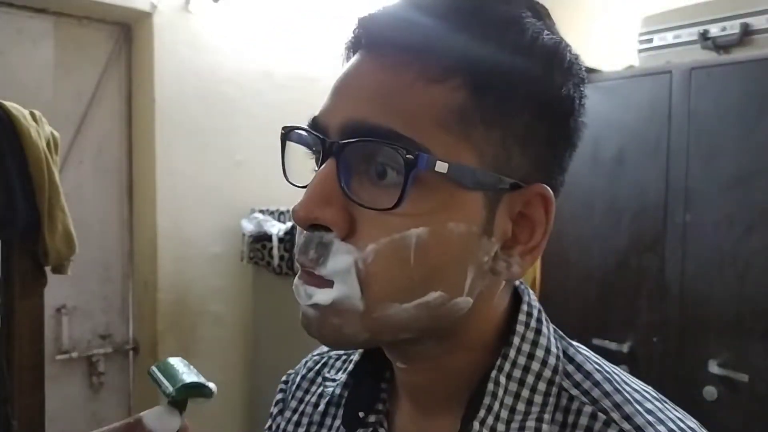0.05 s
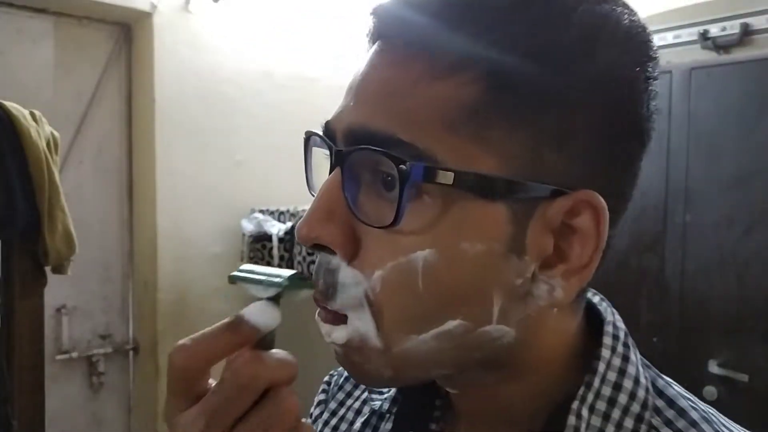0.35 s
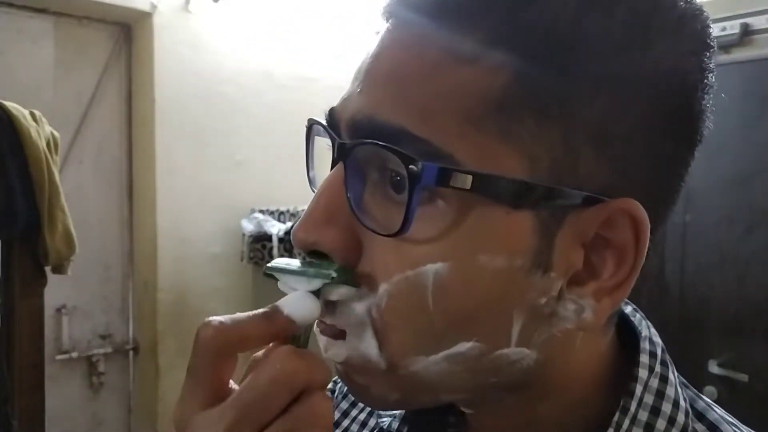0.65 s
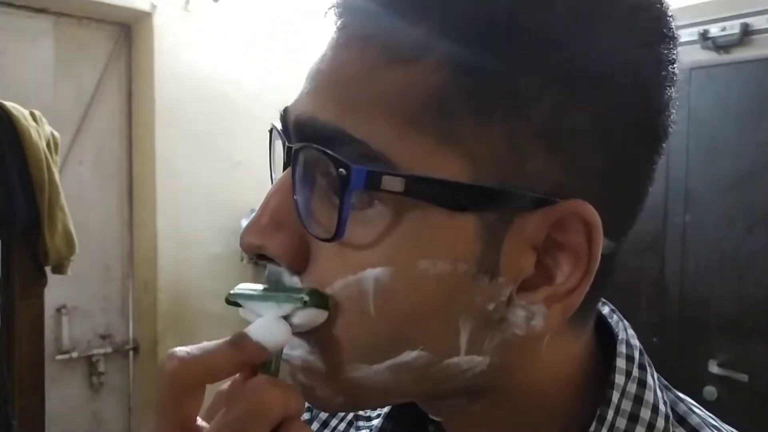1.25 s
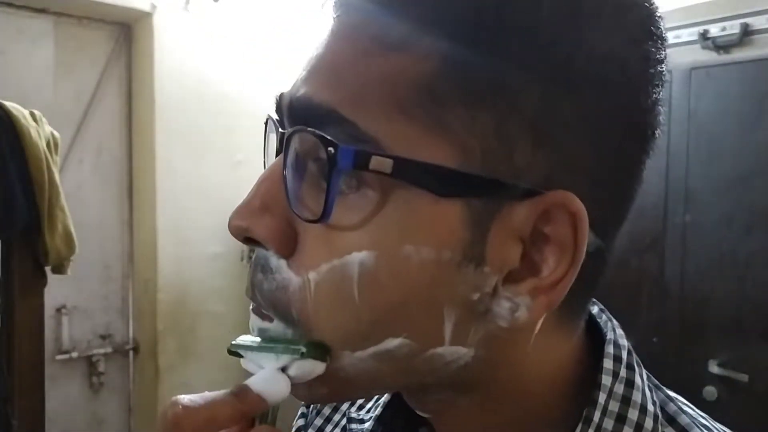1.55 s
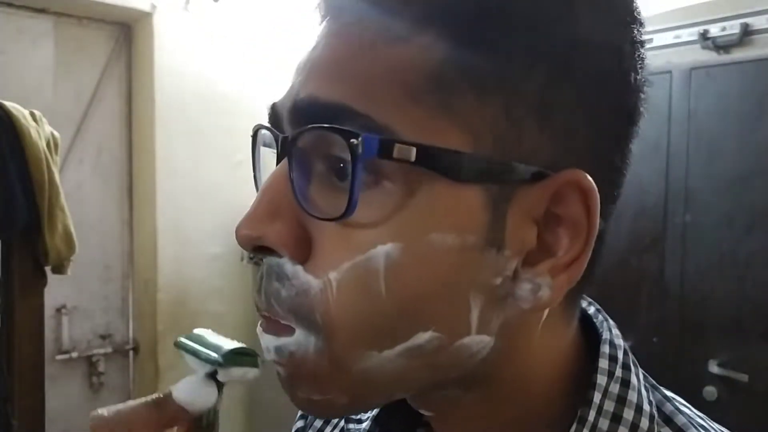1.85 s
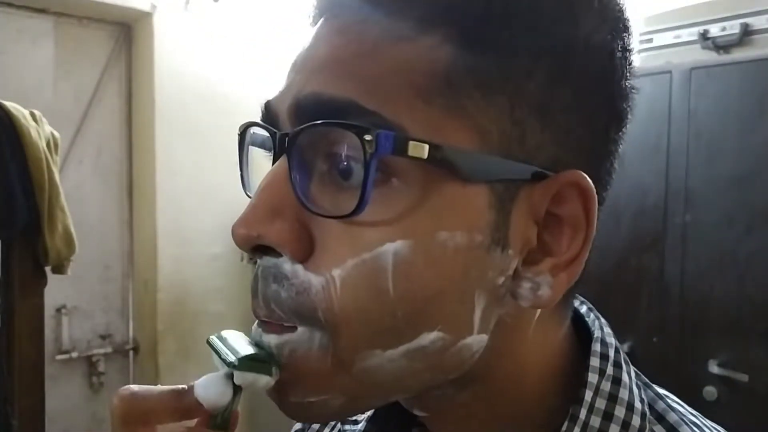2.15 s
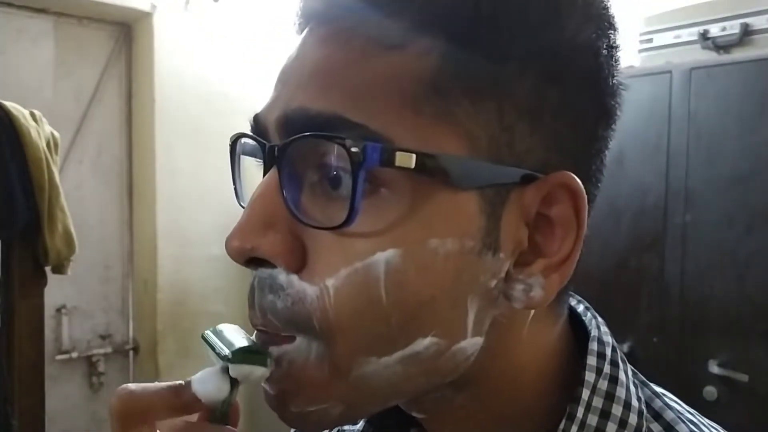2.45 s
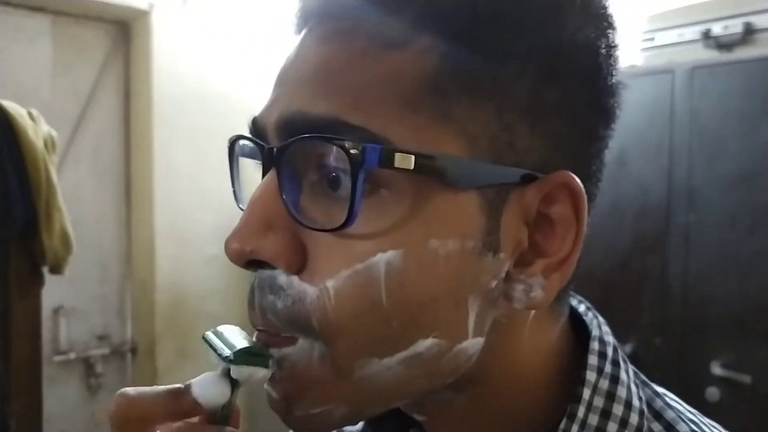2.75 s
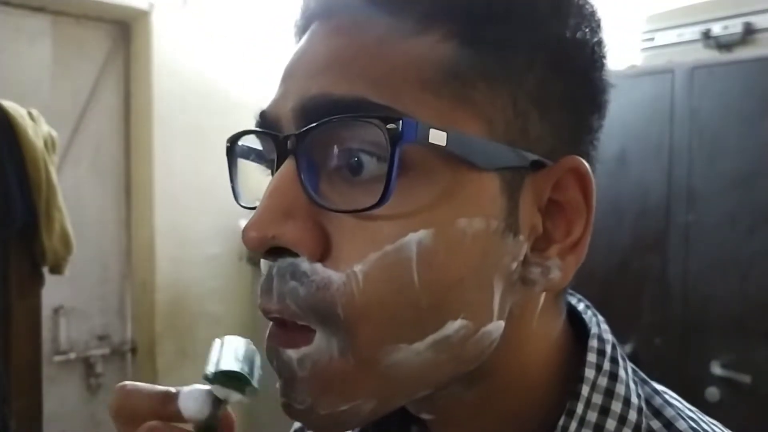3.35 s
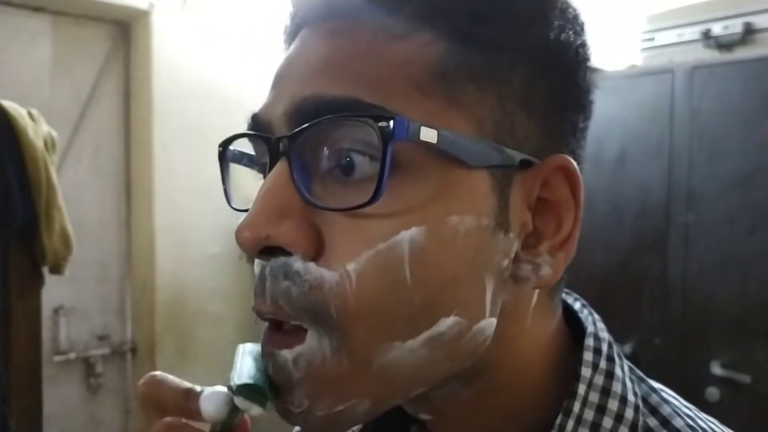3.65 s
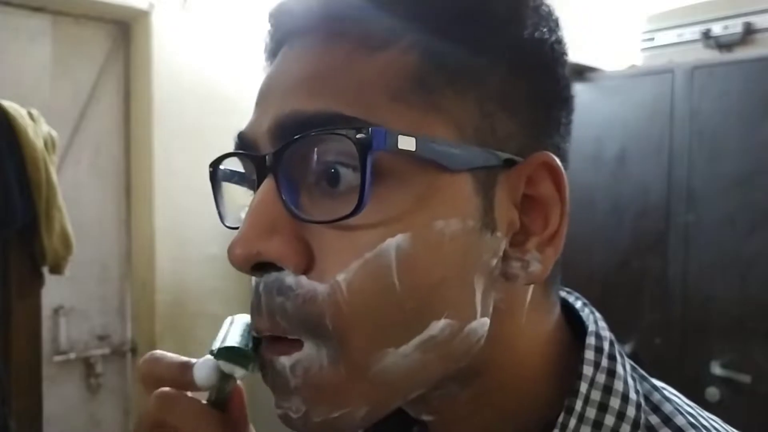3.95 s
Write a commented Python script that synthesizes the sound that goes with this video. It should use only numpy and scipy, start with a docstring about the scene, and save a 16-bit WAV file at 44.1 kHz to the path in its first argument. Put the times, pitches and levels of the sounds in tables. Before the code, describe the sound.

Close, scratchy shaving strokes follow a quick swish as a razor is raised. Hairs crackle and snap under the blade in uneven bursts, over the soft hiss of a small room and a low, distant engine hum.

```python
"""A small room hisses and rumbles, and a distant engine hums through the walls.
A safety razor is raised with a quick swish, glides with a thin high song, then scrapes stubble off a
lip in short dry strokes, gliding again between them. Each stroke is a shower of tiny hair cuts that hiss
at the blade and ring in the razor's head; coarser hairs crackle and single stiff ones snap.
Past the halfway point the engine speeds up a little and its firing tone fades."""
import sys
import numpy as np
from scipy import signal
from scipy.fft import rfft, irfft, next_fast_len
from scipy.io import wavfile

SR = 44100
rng = np.random.default_rng(int(sys.argv[2]) if len(sys.argv) > 2 else 0)


def store_pcm(level_fs):
    """Save levels as 16-bit WAV."""
    pcm = np.round(np.clip(level_fs, -1, 1) * 32767).astype(np.int16)
    wavfile.write(sys.argv[1], SR, np.atleast_2d(pcm).T)


N = 176400
TIME = np.arange(N) / SR
SIZE = next_fast_len(N + SR // 2)
FREQS = np.arange(SIZE // 2 + 1) * SR / SIZE

# room tone, the colour of its low and high layers: (frequency [Hz], relative level [dB])
RUMBLE_COLOUR = [(20, -4.5), (28, -8.5), (42, -6.5), (60, -9), (85, -0.5), (105, 2.5), (145, -6),
                 (188, -3.5), (225, -11), (290, -10.5), (380, -14), (480, -18), (700, -30.5), (1200, -70)]
HISS_COLOUR = [(280, -46), (480, -3), (651, -4), (776, -1), (859, -5), (1040, -3), (1120, -6), (1700, -9),
               (1910, -12), (2240, -11.5), (2520, -12.5), (3470, -15.5), (4990, -25.5), (9060, -17),
               (11300, -35), (13400, -34), (15500, -50)]
# their fader rides: (time [s], level [dB])
RUMBLE_LEVEL = [(0, -40), (0.6, -39), (1.3, -40.5), (2.4, -40.5), (4, -43)]
HISS_LEVEL = [(0, -51.5), (0.3, -50), (1.1, -51), (1.28, -53.5), (1.5, -50), (1.9, -51), (2.6, -52.5),
              (4, -53.5)]
# panning of room tone and engine: (frequency [Hz], left minus right [dB])
BED_BALANCE = [(60, 0.6), (200, -3), (380, -2), (600, 0.5), (2500, 0), (6500, -1), (8600, -4), (9300, 2.5),
               (10700, -2), (12500, 1)]
# how alike the room tone is on both sides: (frequency [Hz], correlation [0 to 1])
BED_LIKENESS = [(60, 0.84), (200, 1), (380, 0.64), (700, 0.34), (1300, 0), (4400, 0), (8000, 0.89),
                (15000, 0.97)]
# engine speed: (time [s], firing rate [Hz])
FIRING_RATE = [(0.2, 62.55), (0.41, 63.08), (0.49, 63.77), (2.12, 63.44), (2.18, 64.62), (2.6, 66.58),
               (3.9, 66.5)]
# fader ride of the firing tone: (time [s], level [dB])
FIRING_LEVEL = [(0.0, -46), (0.1, -59), (0.4, -33), (0.49, -38), (0.53, -33), (1.32, -32), (1.68, -34),
                (1.82, -39), (2.09, -35), (2.56, -50), (2.62, -43), (3.01, -46), (3.34, -42), (3.5, -55),
                (3.53, -49), (4.0, -55)]
# rides of its octave and of the overtones above: (time [s], relative level [dB])
OCTAVE_LEVEL = [(0.0, -47), (0.04, -55), (0.53, -43), (1.04, -43.5), (1.22, -60), (1.38, -43.5),
                (2.48, -41.5), (2.9, -55), (2.94, -61), (4.0, -45.5)]
OVERTONE_LEVEL = [(0, -56), (0.7, -49.5), (1.3, -52), (2.1, -52), (2.8, -54), (4, -54)]
# the engine's overtones: (multiple of the firing rate [ratio], relative level [dB])
OVERTONES = [(2.5, -2.5), (3, 1), (4, -2.5), (5.8, -9)]

# the swish as the razor is raised: (full level at [s], attack [s], hold [s], release [s], level [dB])
SWISH_BURSTS = [(0.063, 0.00069, 0.011, .01, -42), (0.078, 0.0036, 0.016, 0.039, -35.5)]
# its colour: (frequency [Hz], relative level [dB])
SWISH_COLOUR = [(1200.0, -23), (1800.0, -13.0), (2300.0, -5), (3000.0, -4.5), (3800.0, -13.5),
                (4600.0, -9.5), (6200.0, -9.5), (7300.0, -7.5), (8700.0, 3), (9700.0, -5), (11000.0, -5.5),
                (12300.0, -14.5), (13300, -23), (15000.0, -22.5)]
# its panning: (frequency [Hz], left minus right [dB])
SWISH_BALANCE = [(6200.0, -0.3), (7300.0, -7.0), (8700.0, -4.9), (9700.0, 3.4), (11000.0, 9.4),
                 (12300.0, 4.9), (15000.0, -1.0)]
# the direct sound lags on the left: (frequency [Hz], left minus right phase [rad])
LEFT_PHASE = [(0, 0), (1300, -1.6), (2600, -1.6), (3600, -3.4), (4900, -3.9), (5300, -6), (16000, -6.3)]

# the blade glides lightly and sings:
# (full level at [s], attack [s], hold [s], release [s], pitch [Hz], resonance width [Hz], level [dB])
GLIDES = [(0.45, 0.022, 0.059, .03, 8550, 700, -58.5), (0.512, 0.025, .09, .05, 8100, 450, -62.5),
          (1.035, 0.051, 0.11, 0.065, 8260, 500, -59), (2.34, .03, 0.075, 0.034, 8400, 500, -57.5),
          (3.075, .03, 0.13, .03, 8300, 601, -62), (3.525, .015, 0.091, 0.053, 6360, 1700, -58.5),
          (3.737, .03, .05, .04, 8100, 700, -61.5)]
# shaving strokes: (full pressure at [s], attack [s], hold [s], release [s],
# blade hiss [dB], head ring [dB], head pitch [ratio], relative crackle level [dB])
STROKES = [(0.821, 0.13, .030, 0.04, -54, -59, 1.03, -53.5),
           (0.901, 0.032, 0.085, 0.043, -53, -52.5, 1.09, -53.5),
           (1.375, 0.034, 0.039, 0.046, -51, -53, 0.97, -55.5),
           (1.521, 0.028, 0.022, 0.028, -58, -81, 1.21, -54),
           (1.596, 0.0069, 0.069, 0.073, -54, -56.5, 0.79, -66),
           (1.727, .020, 0.022, .016, -62, -68, 0.81, -56),
           (2.21, 0.042, .038, 0.038, -46.3, -47, 1.0, -49.5),
           (2.573, 0.03, 0.034, 0.04, -44.8, -46.8, 1.0, -54),
           (2.874, 0.0058, 0.031, .020, -51, -56, 0.83, -62),
           (2.912, 0.015, 0.024, 0.034, -45.7, -47, .98, -56),
           (3.013, 0.056, 0.028, 0.024, -52, -69, 1.0, -59),
           (3.299, 0.03, 0.012, 0.028, -47, -51, 1.02, -65),
           (3.548, 0.033, 0.14, .020, -55.5, -60, 1.2, -74),
           (3.646, 0.0068, 0.022, 0.062, -47.5, -51.5, 1.01, -63)]
# colour of the hairs parting at the blade: (frequency [Hz], relative level [dB])
BLADE_COLOUR = [(3300.0, -5.5), (4000.0, -5.5), (4600.0, -3), (5150.0, -14), (6000.0, -9), (6500, -10.5),
                (7100.0, -5.5), (7800.0, -1.8), (8700.0, 2.3), (9500.0, -5.5), (10800.0, -7.5),
                (12400.0, -13.5), (14000.0, -17.5), (15400.0, -21.5)]
# panning of glides and strokes: (frequency [Hz], left minus right [dB])
RAZOR_BALANCE = [(5200.0, -0.9), (6300.0, -1.7), (7000.0, -5.3), (7800.0, -9.3), (8700.0, -7.3),
                 (9500.0, -0.4), (10800.0, 4.3), (12300.0, 0.8), (14000.0, 0.4), (15400.0, -0.4)]
# razor head resonances: (frequency at pitch ratio 1 [Hz], width [Hz], relative level [dB])
HEAD_MODES = [(1530, 300, -6), (1942.4, 260, 0.5), (2226, 320, -0.5), (2695, 380, 1), (2830, 200, -7.5)]
# single stiff hairs snap: (time [s], relative level [dB])
SNAPS = [(0.81, -47), (0.823, -37.5), (0.8334, -44), (0.8605, -40), (0.955, -40), (0.985, -36.5),
         (1.2716, -44), (1.3638, -43), (1.374, -41), (1.5370, -41), (1.588, -33.5), (1.6292, -36.5),
         (2.034, -47), (2.1125, -43.5), (2.1429, -40), (2.158, -39), (2.189, -35), (2.4698, -46),
         (2.5541, -32.5), (2.574, -41), (2.874, -39), (2.9068, -41), (3.0067, -40), (3.028, -36.5),
         (3.2026, -47), (3.2774, -45), (3.2984, -31.5), (3.6556, -33)]

OCTAVE_TRIM_DB, OVERTONE_WAVER_DB, OVERTONE_WAVER_RAD = -1, 2, 0.3
ROOM_T60_S, BLADE_ROOM_DB, HEAD_ROOM_DB = 0.11, -1.5, -0.5
SWISH_LOW_CUT_HZ, BLADE_LOW_CUT_HZ, HIGH_CUT_HZ = 1000, 3550, 15750
CUTS_PER_S, CUT_SPREAD_DB, CUT_WIDTH_HZ = 2400, 4.5, 530
CRACK_GAIN, FRICTION_GAIN = 0.61, 0.87   # against the pitched cuts
CATCH_DB, CATCH_RATE_HZ = 0.8, 48   # the blade catches and slips
CRACKLES_PER_S, CRACKLE_SPREAD_DB, CRACKLE_DB_PER_OCTAVE = 520, 1.8, 4
CLUMP_DB, CLUMP_RATE_HZ = 6.5, 38.6   # coarse hairs stand in clumps
SNAP_TRIM_DB, SNAP_TOP_HZ = -5.5, 12500
SNAP_ATTACK_S, SNAP_HOLD_S, SNAP_DECAY_S = 0.00063, 0.0015, 0.0014


def from_db(db):
    """Decibels to gain."""
    return 10 ** (np.asarray(db) / 20)


def rms_one(x):
    """Scale to rms 1."""
    return x / np.sqrt(np.mean(x ** 2) + 1e-20)


def in_time(rows):
    """An automation curve at every sample."""
    return np.interp(TIME, *np.transpose(rows))


def at_hz(points):
    """A curve over frequency, joined on a log axis."""
    hz, value = np.transpose(points)
    return np.interp(np.log(FREQS + 1), np.log(hz), value)


def filtered(x, response):
    """Pass a signal through a frequency response."""
    return irfft(rfft(x, SIZE) * response, SIZE)[..., :N]


def colour(points, low_cut_hz):
    """A minimum-phase EQ with a low cut, at unit power: nothing rings ahead of a click."""
    gain = from_db(at_hz(points)) / np.sqrt(1 + (low_cut_hz / (FREQS + 50)) ** 8)
    cepstrum = irfft(np.log(rms_one(gain)), SIZE)
    cepstrum[1:SIZE // 2] *= 2
    cepstrum[SIZE // 2 + 1:] = 0
    return np.exp(rfft(cepstrum))


def panned(x, balance):
    """Pan each frequency at constant power."""
    gains = from_db(at_hz(balance) * np.array([[.5], [-.5]]))
    return filtered(x, gains / np.sqrt(np.mean(gains ** 2, axis=0)))


def drift(rate_hz):
    """Smooth random modulation at rms 1."""
    return rms_one(filtered(rng.standard_normal(SIZE), 1 / (1 + (FREQS / rate_hz) ** 2)))


def resonance(x, hz, width_hz):
    """Two-pole resonance with gain 1 at its peak."""
    r = np.exp(-np.pi * width_hz / SR)
    feedback = [1, -2 * r * np.cos(2 * np.pi * hz / SR), r * r]
    return signal.lfilter(np.array([1, 0, -1]) * (1 - r * r) / 2, feedback, x)


def envelope(full_at, attack, hold, release):
    """Exponential rise, hold, exponential fall."""
    return np.exp(np.minimum(TIME - full_at, 0) / attack - np.maximum(TIME - full_at - hold, 0) / release)


def in_room(x, room_db):
    """The direct sound reaches the right side first; a short diffuse tail follows."""
    left_phase = np.interp(FREQS, *np.transpose(LEFT_PHASE))
    direct = filtered(x, np.exp(1j * left_phase * np.array([[1], [0]])))
    t = TIME[:SR // 2]
    tail = rng.standard_normal((2, len(t))) * from_db(-60 * t / ROOM_T60_S) * (t > .002)
    tail /= np.sqrt(np.sum(tail ** 2, axis=1, keepdims=True))
    reverb = from_db(room_db) * filtered(x, rfft(tail, SIZE))
    return (direct + reverb) / np.sqrt(1 + from_db(2 * room_db))


def room_tone(spectrum, level):
    """A bed of noise, narrow in the bass and at the top, wide in the mids."""
    mid, side = filtered(rng.standard_normal((2, SIZE)), from_db(at_hz(spectrum)))
    alike = np.clip(at_hz(BED_LIKENESS), -.999, .999)
    stereo = filtered(mid, np.sqrt(1 + alike)) + filtered(side, np.sqrt(1 - alike)) * [[1], [-1]]
    return from_db(in_time(level)) * rms_one(panned(stereo, BED_BALANCE))


def engine():
    """A distant engine through the walls: its firing tone, the octave and a few wavering overtones."""
    phase = 2 * np.pi * np.cumsum(in_time(FIRING_RATE)) / SR
    firing = from_db(in_time(FIRING_LEVEL)) * np.sin(phase)
    octave_gain = from_db(in_time(OCTAVE_LEVEL) + OCTAVE_TRIM_DB)
    octave = octave_gain * np.sin(2 * phase + 2 * np.pi * rng.random())
    overtones = np.zeros(N)
    for multiple, db in OVERTONES:
        gain = from_db(db + OVERTONE_WAVER_DB * drift(rate_hz=1.9))
        offset = 2 * np.pi * rng.random() + OVERTONE_WAVER_RAD * drift(rate_hz=3)
        overtones += gain * np.sin(multiple * phase + offset)
    hum = firing + octave + from_db(in_time(OVERTONE_LEVEL)) * overtones
    return panned(np.sqrt(2) * hum, BED_BALANCE)


def swish():
    """The razor is raised: a quick, bright brush with the same grit as the strokes."""
    level = np.max([from_db(db) * envelope(*shape) for *shape, db in SWISH_BURSTS], axis=0)
    brush = filtered(grit() * level, colour(SWISH_COLOUR, SWISH_LOW_CUT_HZ))
    return panned(in_room(brush, BLADE_ROOM_DB), SWISH_BALANCE)


def grit(pitch_count=18):
    """Tiny cuts ring at scattered pitches over cracks and friction, fluttering as the edge catches."""
    cuts = clicks(CUTS_PER_S, CUT_SPREAD_DB)
    pitch_index = rng.integers(0, pitch_count, N)
    rings = sum(resonance(cuts * (pitch_index == k) + 1e-18, hz, CUT_WIDTH_HZ)
                for k, hz in enumerate(np.linspace(1500, 15500, pitch_count)))
    cracks = CRACK_GAIN * rms_one(clicks(CUTS_PER_S, CUT_SPREAD_DB))
    friction = FRICTION_GAIN * rng.standard_normal(N)
    flutter = from_db(CATCH_DB * drift(CATCH_RATE_HZ))
    return rms_one((rms_one(rings) + cracks + friction) * flutter)


def clicks(per_s, spread_db):
    """Random clicks of uneven size."""
    sizes = from_db(spread_db * np.minimum(rng.exponential(1, N), 4)) * rng.choice([-1, 1], N)
    return sizes * (rng.random(N) < per_s / SR)


def glides():
    """Light rubbing makes the blade sing, one high resonance to a glide."""
    rub = rng.standard_normal(N)
    song = np.zeros(N)
    for *shape, hz, width, db in GLIDES:
        whistle = resonance(resonance(rub, hz, width), hz, 2 * width)
        song += from_db(db) * envelope(*shape) * rms_one(whistle)
    return panned(in_room(song, BLADE_ROOM_DB), RAZOR_BALANCE)


def strokes():
    """Cuts, crackle and snaps sound at the blade; the cuts also ring the head."""
    cuts = grit()
    pressure = np.array([envelope(*row[:4]) for row in STROKES])
    hiss_db, ring_db, pitches, crackle_db = np.array(STROKES)[:, 4:].T
    # overlapping strokes add in power
    hiss_gain, crackle_gain = np.sqrt(from_db([hiss_db, crackle_db]) ** 2 @ pressure ** 2)
    scrape = cuts * hiss_gain + crackle() * crackle_gain + snaps()
    blade = filtered(scrape, colour(BLADE_COLOUR, BLADE_LOW_CUT_HZ))
    head = sum(from_db(db) * press * head_ring(cuts, pitch)
               for db, press, pitch in zip(ring_db, pressure, pitches))
    return panned(in_room(blade, BLADE_ROOM_DB) + in_room(head, HEAD_ROOM_DB), RAZOR_BALANCE)


def crackle():
    """Coarse hairs part with sharp, bright clicks that come in clumps."""
    clumps = from_db(CLUMP_DB * np.clip(drift(CLUMP_RATE_HZ), -2, 1))
    tilt = from_db(CRACKLE_DB_PER_OCTAVE * np.log2(np.clip(FREQS, 2000, HIGH_CUT_HZ) / 8500))
    return filtered(rms_one(clicks(CRACKLES_PER_S, CRACKLE_SPREAD_DB) * clumps), tilt)


def head_ring(cuts, pitch):
    """The head's resonances, shifted a little by how it lies on the skin."""
    ring = sum((-1) ** k * from_db(db) * resonance(cuts, hz * pitch, width)
               for k, (hz, width, db) in enumerate(HEAD_MODES))
    return rms_one(signal.sosfilt(signal.butter(2, [1300, 3400], "band", fs=SR, output="sos"), ring))


def snaps():
    """A stiff hair gives way in a burst of a few milliseconds."""
    shape = SNAP_ATTACK_S, SNAP_HOLD_S, SNAP_DECAY_S
    level = sum(from_db(db + SNAP_TRIM_DB) * envelope(at + SNAP_ATTACK_S, *shape) for at, db in SNAPS)
    bursts = level * rng.standard_normal(N)
    return signal.sosfilt(signal.butter(2, SNAP_TOP_HZ, fs=SR, output="sos"), bursts)


def scene():
    """The razor up front, over a bed of engine hum and room tone."""
    razor = swish() + strokes() + glides()
    bed = engine() + room_tone(RUMBLE_COLOUR, RUMBLE_LEVEL) + room_tone(HISS_COLOUR, HISS_LEVEL)
    return razor + bed


def record(dry):
    """A steep high cut on the whole mix."""
    return signal.sosfilt(signal.ellip(12, .1, 90, HIGH_CUT_HZ, fs=SR, output="sos"), dry)


dry = scene()
out = record(dry)
store_pcm(out)
```